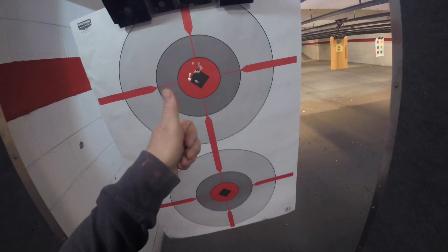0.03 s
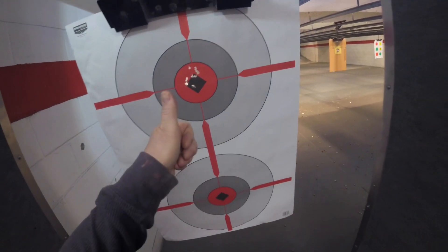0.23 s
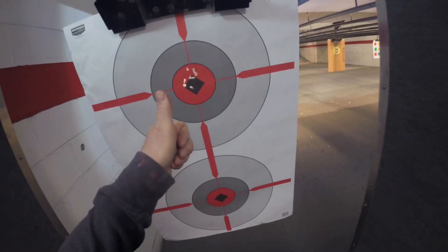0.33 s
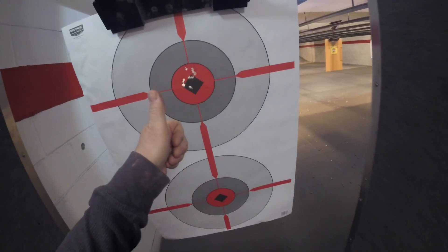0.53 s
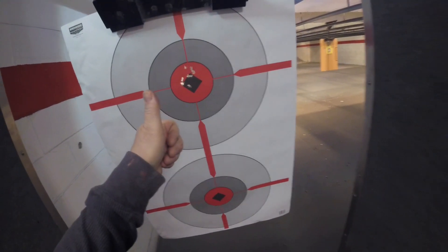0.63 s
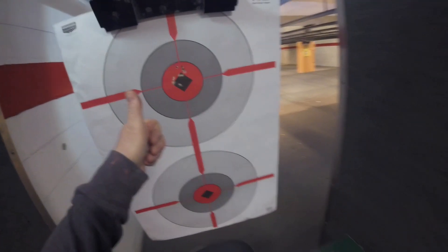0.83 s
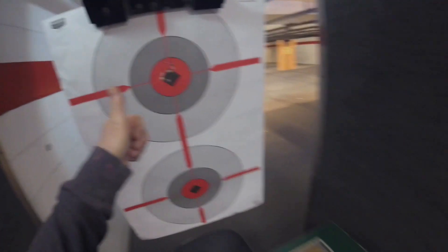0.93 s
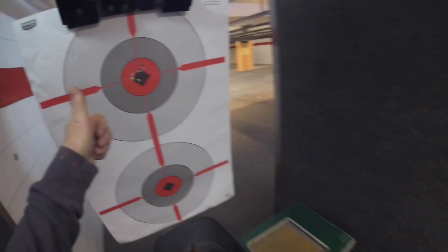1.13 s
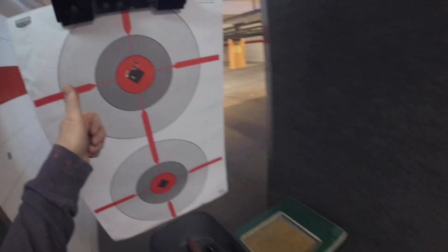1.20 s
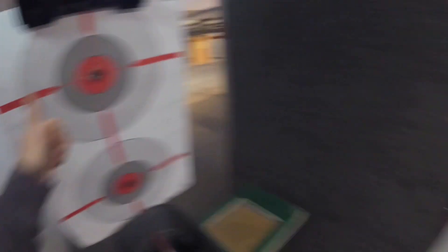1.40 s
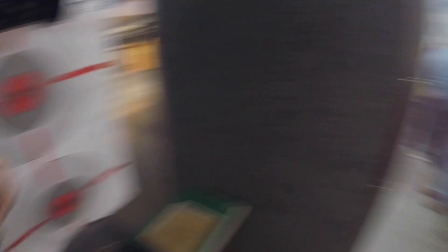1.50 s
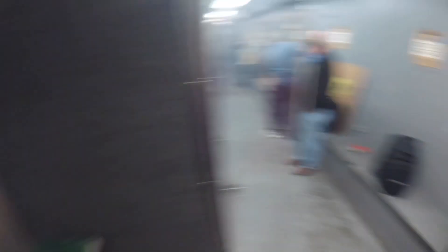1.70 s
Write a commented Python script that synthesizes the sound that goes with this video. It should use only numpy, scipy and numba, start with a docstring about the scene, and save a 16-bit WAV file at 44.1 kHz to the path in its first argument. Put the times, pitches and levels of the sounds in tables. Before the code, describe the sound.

A single gunshot from the next lane cracks and booms through an indoor shooting range, leaving a long echoing tail. Before it come faint metal clacks and one close snap, over ventilation noise and thin high whines.

```python
"""Air buffets the microphone over ventilation noise and thin high whines, in an indoor shooting range.
Metal gear clacks in other lanes, something squeaks and rustles faintly, and a catch snaps close by.
Then a shot from the next lane: a crack bent round the partition, a deep pressure wave, the boom of the
hall, returns from its far end and a long tail. The recorder's gain control ducks and recovers slowly."""
import sys
import numpy as np
from scipy import signal
from scipy.fft import rfft, irfft
from scipy.io import wavfile
from numba import njit

SR = 44100
rng = np.random.default_rng(int(sys.argv[2]) if len(sys.argv) > 2 else 0)


def store_wav(level_fs):
    """Save 16-bit WAV to argv[1]."""
    pcm = np.round(np.clip(np.atleast_2d(level_fs), -1, 1) * 32767)
    wavfile.write(sys.argv[1], SR, pcm.T.astype(np.int16))


N = 77175

# Levels in a colour or a set of resonances are relative: they only shape a noise.
# ventilation heard across the hall (frequency [Hz], level [dB])
VENT_COLOUR = [(60, 14.5), (200, -0.5), (400, -3), (650, -5.5), (900, -3.5), (1200, -4.5), (1700, -8.5),
               (3200, -10.5), (5000, -21), (8000, -28), (10500, -36), (16000, -61)]
# resonances of its ducts (frequency [Hz], width [Hz], level [dB])
DUCT_RINGS = [(655, 40, 2), (1196, 26, -6.5), (2050, 37, -5)]
# gusts of draught right on the microphone (time [s], level [dB])
BUFFET_GUSTS = [(0, -27.5), (.1, -28.5), (.23, -21.5), (.35, -26.5), (.5, -19.5), (.58, -25.5),
                (.68, -20.5), (.74, -19), (1.4, -42), (1.58, -27.5), (1.65, -26.5), (1.75, -26)]
# their rumble (frequency [Hz], level [dB])
BUFFET_COLOUR = [(10, -9), (25, -1.5), (50, 2), (85, -2.5), (130, -17), (200, -21), (400, -43), (1000, -69)]

# course of the main whine (time [s], level [dB])
WHINE_LEVEL = [(0, -57.5), (.076, -47), (.144, -59), (.208, -49.5), (.236, -69), (.276, -48.5),
               (.338, -48.5), (.382, -51), (.494, -53.5), (.564, -43.5), (.608, -56.5), (.69, -45.5),
               (.74, -63), (.9, -81)]
# swells of its octave (time [s], relative level [dB])
OCTAVE_SWELL = [(0, 7), (.06, 3), (.14, 13.5), (.2, -1), (.29, 2), (.36, 10), (.6, -2.5), (.9, -9.5)]
# swells of a lower whine that comes up late (time [s], relative level [dB])
LATE_WHINE_SWELL = [(0, -18), (1.2, -6), (1.34, 15.5), (1.42, 1), (1.5, 2), (1.59, 8.5), (1.66, -3)]
# course of a thin note around the squeak (time [s], level [dB])
THIN_NOTE_LEVEL = [(0, -77), (.11, -50.5), (.22, -58), (.29, -63), (.35, -45), (.41, -51), (.6, -80)]
# resonances of the rustle (frequency [Hz], width [Hz], level [dB])
RUSTLE_RINGS = [(2820, 160, 2), (3480, 450, -7)]

# gear knocked in other lanes (time [s], level [dB], t60 [s])
CLACKS = [(0.042, -32, 0.22), (.081, -43, 0.18), (.17, -44, 0.75), (0.357, -26.5, 0.18), (.371, -38, 0.12),
          (.392, -39, 0.33), (.49, -41, 0.17), (0.673, -32, 0.33), (0.69, -39, 0.11)]
# its ring, smeared by the hall (frequency [Hz], width [Hz], level [dB])
CLACK_RINGS = [(1114, 41, 6.5), (1956, 66, 1), (2350, 290, -6.5), (2980, 150, -18), (6270, 200, -7),
               (8040, 200, -14.5)]
# its broad clatter (frequency [Hz], level [dB])
CLACK_COLOUR = [(300, -21.5), (900, -2.5), (1200, -0.5), (3300, -1.5), (5000, -10.5), (8300, -15.5),
                (10500, -24), (14500, -30), (16000, -40)]
# modes of the metal (frequency [Hz], relative level [dB], t60 [s])
CLACK_MODES = [(1127, -10, 0.058), (1165, -9, .2), (1940, -8.5, .12), (2059, -13, 0.27)]

# contacts of the catch near the microphone (time [s], click level [dB], knock level [dB])
CATCH_CONTACTS = [(.6209, -10, -55), (0.623, -20.5, -34), (.6256, -8.5, -30), (0.6304, -18.5, -16.5),
                  (0.653, -31, -58), (0.6572, -32, -60)]
# click of one contact (frequency [Hz], level [dB])
CATCH_CLICK_COLOUR = [(200, -17), (1000, -1), (2300, -11.5), (3130, -4.5), (4120, -19), (5500, 4),
                      (6100, -1.5), (6880, -16), (7800, -4), (9400, -7.5), (10600, -20.5), (11600, -8),
                      (13400, -8), (16000, -19)]
# faint ring after it (frequency [Hz], level [dB])
CATCH_RING_COLOUR = [(500, -12), (3000, -5.5), (6000, -3.5), (7500, -13), (9500, 4), (10800, -3),
                     (12000, 5), (15500, -3)]
# modes of the catch's body (frequency [Hz], relative level [dB], t60 [s])
CATCH_MODES = [(894, -2.5, 0.037), (1250, -14, .02), (426, -12, 0.0125)]

# dull return from the far wall (frequency [Hz], level [dB])
FAR_WALL_COLOUR = [(40, -14), (150, -8.5), (400, -0.5), (800, 2.5), (1500, -6), (3000, -21), (5000, -37),
                   (8000, -54), (16000, -74)]
# tail that lingers down range (frequency [Hz], level [dB])
TAIL_COLOUR = [(40, -8), (150, 8), (200, -3.5), (270, -2.5), (500, 1), (800, 3.5), (1500, -8.5),
               (2800, -22), (4500, -49.5), (9000, -72)]
# the hall's longest-lived resonances (frequency [Hz], width [Hz], level [dB])
TAIL_RINGS = [(251, 14, 2.5), (441, 26, 1.5), (787, 73, -0.5)]
# the boom and its returns at the microphone
# (time [s], level [dB], rise [s], tilt about 500 Hz [dB/octave], bass cut [Hz])
BOOM_ARRIVALS = [(0.763, 5.5, 0.0047, 0.18, 30), (.838, -0.5, 0.007, -1.5, 300),
                 (0.893, 3, 0.0044, -1.5, 130), (.935, -3.5, 0.01, -3.7, 40)]
# broad body of the boom (frequency [Hz], level [dB])
BOOM_COLOUR = [(20, -12), (40, -4.5), (65, 2.5), (110, -0.5), (160, -3), (300, -3), (420, -4), (700, -10.5),
               (1000, -7.5), (1600, -13.5), (2500, -20), (4000, -28.5), (6400, -36.5), (9000, -45.5),
               (11500, -56), (16000, -73)]
# hall resonances that stand out in it (frequency [Hz], width [Hz], level [dB])
HALL_RINGS = [(152, 8.9, 0), (244.8, 3.9, -4.5), (301, 10, -8.5), (331.4, 5.3, -3.5), (436.5, 4, -2.5),
              (541, 8, -9), (676, 66, -6.5), (873, 82, -9), (1044, 10, -12), (1380, 12, -17),
              (1460, 11.6, -16), (1785, 35, -14)]
# reverberation time of the hall (frequency [Hz], t60 [s])
HALL_T60 = [(50, 0.56), (150, 0.66), (400, 0.68), (800, 1), (1600, 0.65), (3500, 0.97), (7000, 0.62),
            (13000, 0.43)]
# the pressure wave and its returns (time [s], level [dB], hall note [Hz], t60 [s])
THUMPS = [(.764, 9, 62.3, 0.16), (.787, -8, 303, 0.26), (0.852, 5, 60.5, 0.31), (.893, 3, 154.3, 0.31),
          (.897, -1.5, 224.7, 0.26)]
# the crack's arrivals round the partition (time [s], relative level [dB])
CRACK_ARRIVALS = [(0.738, -6.5), (0.748, 1.5)]
# its resonances (frequency [Hz], width [Hz], level [dB])
CRACK_RINGS = [(1100, 210, -8.5), (1408, 43, 5), (1720, 200, -7), (2843, 150, -10.5), (3365, 97, -14),
               (4344, 84, -16.5)]
# its broad part (frequency [Hz], level [dB])
CRACK_COLOUR = [(200, -3.5), (700, -2), (1500, 0.5), (3000, -21), (5500, -21.5), (9200, -25), (10500, -45),
                (16000, -57)]


def undb(db):
    """Decibels to gain."""
    return 10 ** (np.asarray(db) / 20)


def unit(x):
    """Scaled to rms 1."""
    return x / np.sqrt(np.mean(x ** 2))


def times():
    """Time of each sample, in seconds."""
    return np.arange(N) / SR


def freqs():
    """Frequency of each spectral bin, at least 1 Hz."""
    return np.maximum(np.fft.rfftfreq(N, 1 / SR), 1)


def at_hz(points, hz):
    """Reads (frequency [Hz], value) points on a log-frequency axis."""
    point_hz, values = np.array(points).T
    return np.interp(np.log(hz), np.log(point_hz), values)


def fader(points):
    """Gain at each sample from (time [s], level [dB]) points."""
    return undb(np.interp(times(), *np.array(points).T))


def noise(gain):
    """Noise of rms 1, its spectrum shaped by a gain for each bin."""
    phases = np.exp(2j * np.pi * rng.random(N // 2 + 1))
    return unit(irfft(gain * phases, N))


def coloured(points):
    """Noise of rms 1 shaped by (frequency [Hz], level [dB]) points."""
    return noise(undb(at_hz(points, freqs())))


def ringing(rings):
    """Noise of rms 1 with resonant peaks, as if excited by dense reflections."""
    f = freqs()
    power = sum(undb(db) ** 2 / (1 + ((f * f - hz * hz) / (f * width)) ** 2 / 2) ** 2
                for hz, width, db in rings)
    return noise(np.sqrt(power))


def strike(start, rise, t60, hold=0):
    """Envelope with a linear rise, a hold and a fall of 60 dB per t60; all in seconds."""
    age = times() - start
    decay = np.exp(-np.log(1000) * np.maximum(age - rise - hold, 0) / t60)
    return np.clip(age / rise, 0, 1) * decay


def mode(hz, start, rise, t60):
    """A struck resonance: a decaying sine."""
    return np.sin(2 * np.pi * hz * (times() - start)) * strike(start, rise, t60)


def tone(hz, waver_hz, harmonics_db=(0,)):
    """Harmonics of a slightly unsteady pitch."""
    waver = noise(1 / (1 + (freqs() / 40) ** 2))
    phase = 2 * np.pi * np.cumsum(hz + waver_hz * waver) / SR
    return np.sqrt(2) * sum(undb(db) * np.sin(k * phase) for k, db in enumerate(harmonics_db, 1))


def bands(x, count=19, lowest_hz=32):
    """Splits a sound into overlapping half-octave bands: (centre [Hz], band)."""
    spectrum = rfft(x)
    place = np.clip(2 * np.log2(freqs() / lowest_hz), 0, count - 1)
    for k in range(count):
        triangle = np.maximum(1 - abs(place - k), 0)
        yield lowest_hz * 2 ** (k / 2), irfft(spectrum * triangle, N)


def ventilation():
    """Room tone: air rushes through ringing ducts, swelling briefly and then fading."""
    rush = undb(-34) * coloured(VENT_COLOUR)
    ducts = undb(-46.5) * ringing(DUCT_RINGS)
    peak_s, slope_db_per_s = 0.53, 12.5
    return (rush + ducts) * undb(-slope_db_per_s * abs(times() - peak_s))


def buffet():
    """The ventilation's draught hits the microphone in low, rumbling gusts."""
    return fader(BUFFET_GUSTS) * coloured(BUFFET_COLOUR)


def whines():
    """Four thin high tones swell and fade in the background."""
    main_hz = 4002
    main = fader(WHINE_LEVEL) * tone(main_hz, waver_hz=4)
    octave = undb(-70) * fader(OCTAVE_SWELL) * tone(2 * main_hz, waver_hz=6)
    late = undb(-57.5) * fader(LATE_WHINE_SWELL) * tone(3340, waver_hz=3)
    thin = fader(THIN_NOTE_LEVEL) * tone(3256, waver_hz=2.6)
    return main + octave + late + thin


def squeak():
    """A short faint squeak whose pitch arches slightly."""
    centre_s, spread_s = 0.275, 0.032
    away = ((times() - centre_s) / spread_s) ** 2
    pitch_hz = 3230 - 6 * np.minimum(away, 2)
    return np.exp(-away / 2) * tone(pitch_hz, waver_hz=11, harmonics_db=[-52, -51.5, -56])


def rustle():
    """A brief dry rustle along with the squeak."""
    return undb(-36.5) * ringing(RUSTLE_RINGS) * strike(0.237, rise=0.017, t60=0.13)


def clacks():
    """Metal gear handled some lanes from the microphone: it rings briefly and the hall smears it."""
    rise_s = 0.015
    clatter = unit(ringing(CLACK_RINGS) + undb(0.5) * coloured(CLACK_COLOUR))
    power = sum((undb(db) * strike(start, rise_s, t60)) ** 2 for start, db, t60 in CLACKS)
    out = clatter * np.sqrt(power)
    for start, db, _ in CLACKS:
        for hz, mode_db, t60 in CLACK_MODES:
            ring = np.sin(2 * np.pi * (hz * times() + rng.random()))
            out += undb(db + mode_db) * ring * strike(start, rise_s, t60)
    return out


def catch():
    """A catch snaps close to the microphone: a few hard contacts click and knock its body."""
    rise_s = 0.00027
    click = coloured(CATCH_CLICK_COLOUR)
    ring = undb(-38) * coloured(CATCH_RING_COLOUR)
    out = np.zeros(N)
    for start, click_db, knock_db in CATCH_CONTACTS:
        out += undb(click_db) * click * strike(start, rise_s, t60=0.0086)
        out += undb(click_db) * ring * strike(start, rise_s, t60=0.19)
        for hz, mode_db, t60 in CATCH_MODES:
            out += undb(knock_db + mode_db) * mode(hz, start, rise_s, t60)
    return out


def far_wall():
    """The blast swells back from the far end of the range, dulled by the distance."""
    return undb(-4) * coloured(FAR_WALL_COLOUR) * strike(0.96, rise=0.12, t60=0.66)


def tail():
    """Reverberation builds from the first boom and lingers down range."""
    wash = coloured(TAIL_COLOUR) + undb(-8.5) * ringing(TAIL_RINGS)
    boom_s = BOOM_ARRIVALS[0][0]
    return undb(-4) * wash * strike(boom_s, rise=0.08, t60=1.92)


def boom():
    """The blast fills the hall and returns from its walls; each band dies at its own rate."""
    field = coloured(BOOM_COLOUR) + undb(-5) * ringing(HALL_RINGS)
    out = np.zeros(N)
    for hz, band in bands(field):
        octaves, t60 = np.log2(hz / 500), at_hz(HALL_T60, hz)
        power = np.zeros(N)  # diffuse arrivals add in power
        for start, db, rise, tilt, cut_hz in BOOM_ARRIVALS:
            envelope = undb(db + tilt * octaves) * strike(start, rise, t60)
            power += envelope ** 2 / (1 + (cut_hz / hz) ** 4)
        out += band * np.sqrt(power)
    return out


def thump():
    """The blast's pressure wave and its returns, each booming at a low note of the hall."""
    return sum(undb(db) * mode(hz, start, rise=0.0089, t60=t60) for start, db, hz, t60 in THUMPS)


def crack():
    """The first, bright sound of the shot, one lane away, bent round the partition in two steps."""
    body = ringing(CRACK_RINGS) + undb(-4) * coloured(CRACK_COLOUR)
    power = sum((undb(db) * strike(start, rise=0.0038, t60=0.17, hold=0.014)) ** 2
                for start, db in CRACK_ARRIVALS)
    return undb(-13.5) * body * np.sqrt(power)


def scene():
    """One microphone in a lane: the shot next door, small sounds around it and the background."""
    shot = crack() + thump() + boom() + tail() + far_wall()
    small_sounds = rustle() + clacks() + catch() + whines() + squeak()
    air = ventilation() + buffet()
    return (shot + small_sounds + air)[None]


@njit
def follow(x, attack_s, release_s):
    """The recorder's level follower, with one time constant going up and another going down."""
    out, level = np.empty(len(x)), 0.
    for i in range(len(x)):
        lag_s = attack_s if x[i] > level else release_s
        level += (x[i] - level) / (lag_s * SR)
        out[i] = level
    return out


def record(dry):
    """The recorder ducks under the shot, rounds the peaks, adds a little hiss and cuts the top."""
    threshold_db, ceiling, hiss_db, top_hz = -3.5, 1.1, -68.5, 15900
    level = follow(abs(dry[0]), attack_s=0.0021, release_s=1.5)
    ahead = np.maximum(level, np.roll(level, -(SR // 500)))  # looks 2 ms ahead
    ducked = dry / np.maximum(ahead / undb(threshold_db), 1)
    rounded = ducked / (1 + (ducked / ceiling) ** 4) ** .25
    hiss = undb(hiss_db) * rng.standard_normal(N)
    lowpass = signal.ellip(8, .2, 70, top_hz, fs=SR, output="sos")
    return signal.sosfilt(lowpass, rounded + hiss)


dry = scene()
out = record(dry)
store_wav(out)
```